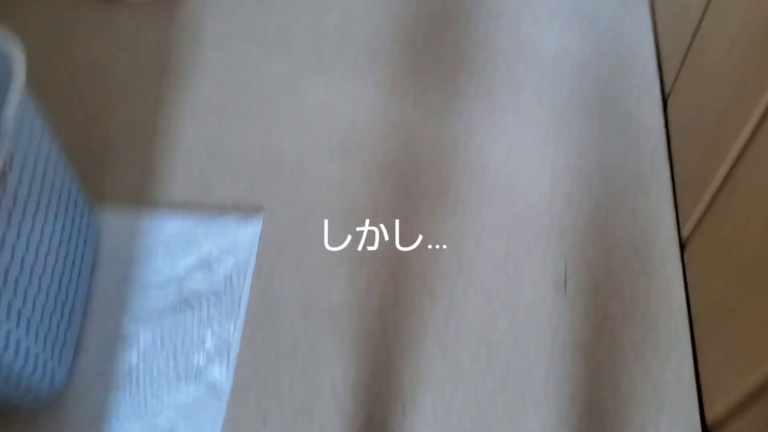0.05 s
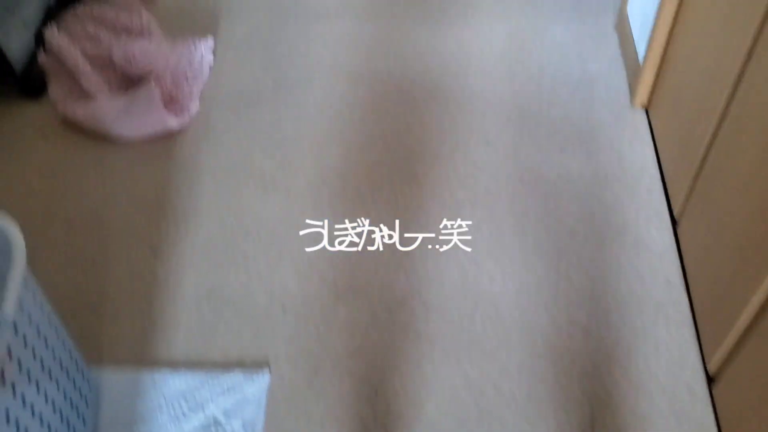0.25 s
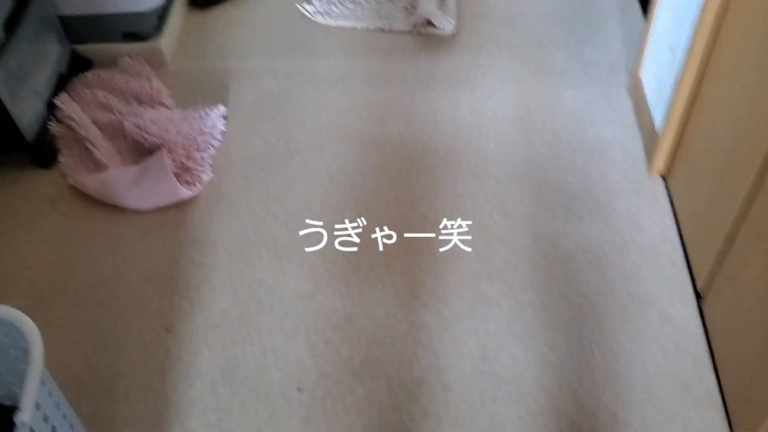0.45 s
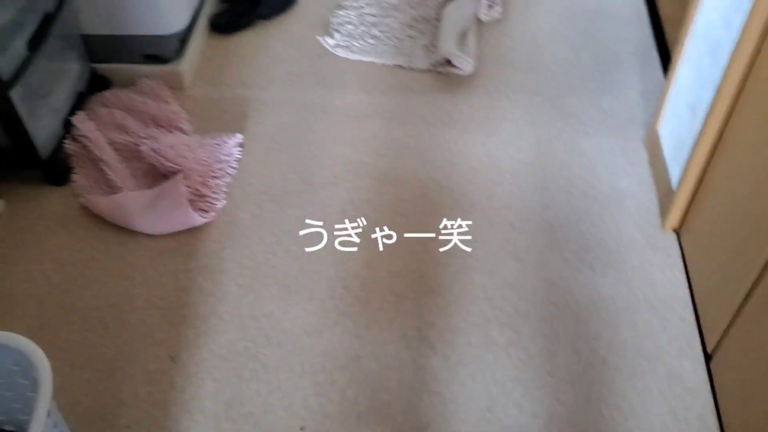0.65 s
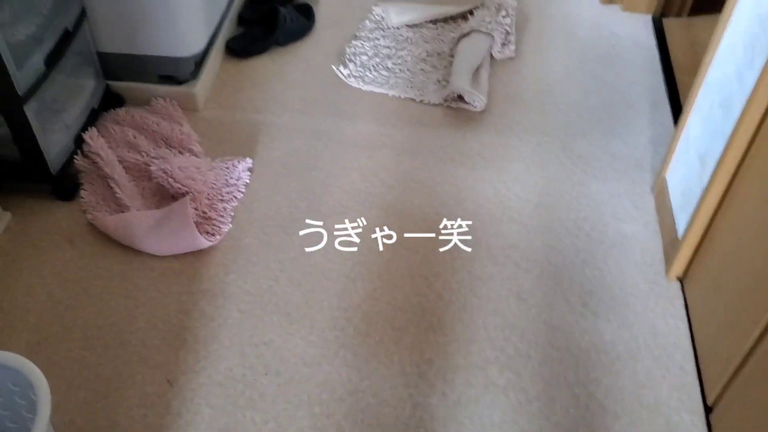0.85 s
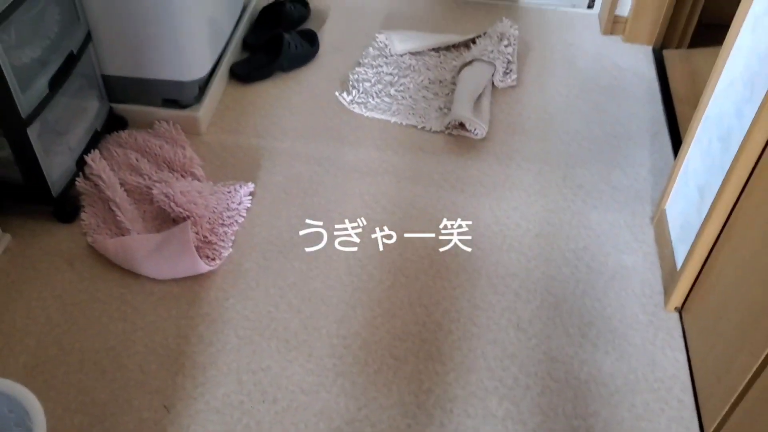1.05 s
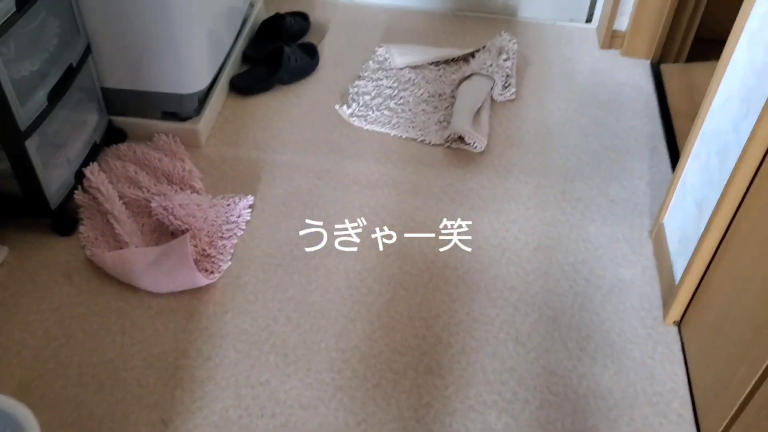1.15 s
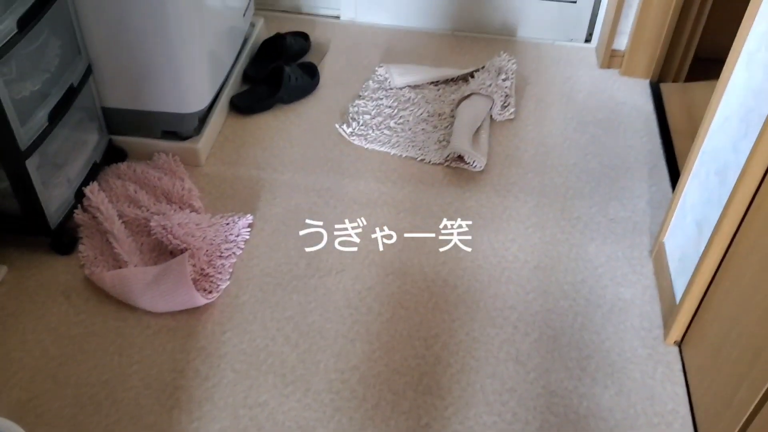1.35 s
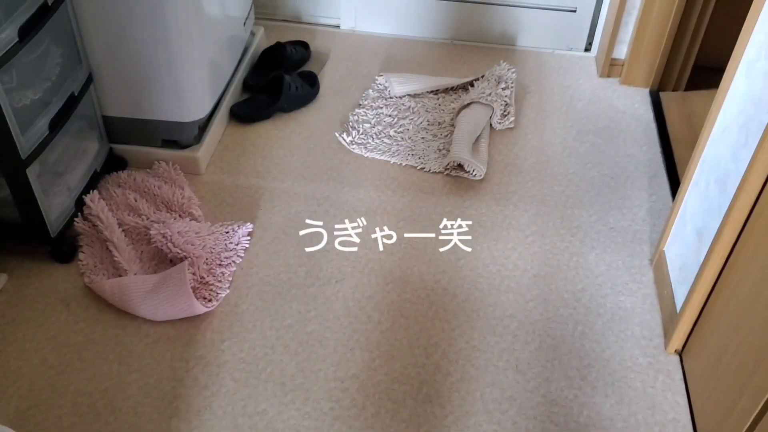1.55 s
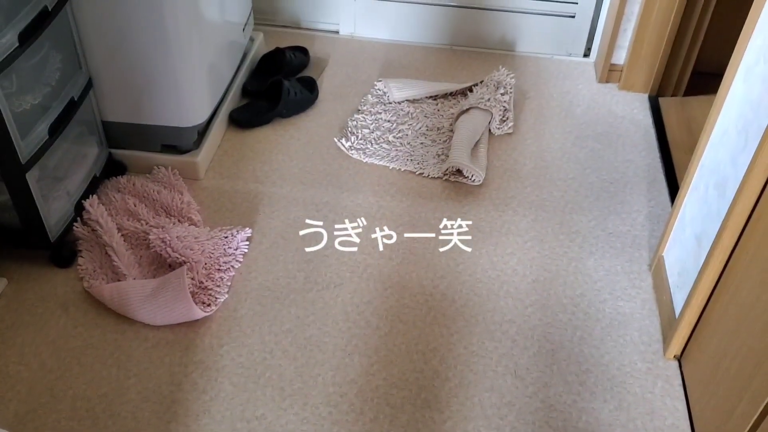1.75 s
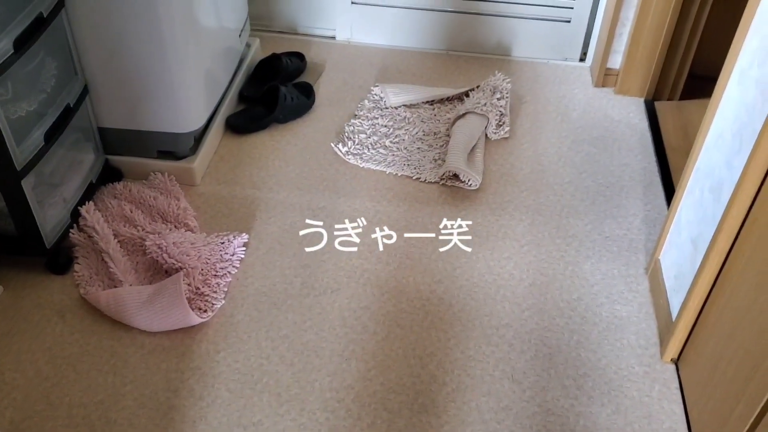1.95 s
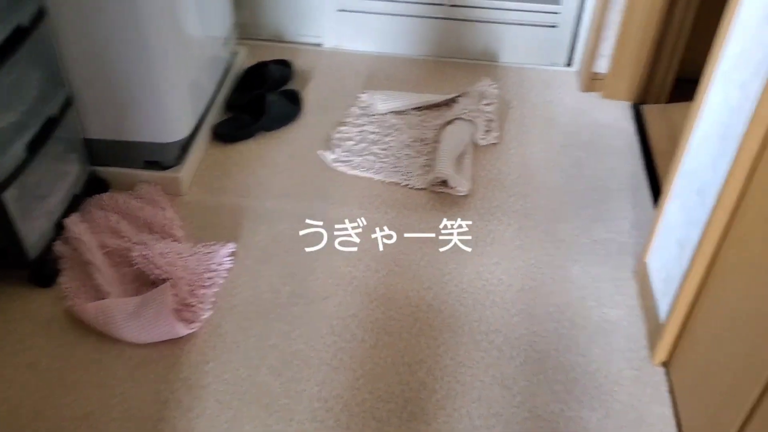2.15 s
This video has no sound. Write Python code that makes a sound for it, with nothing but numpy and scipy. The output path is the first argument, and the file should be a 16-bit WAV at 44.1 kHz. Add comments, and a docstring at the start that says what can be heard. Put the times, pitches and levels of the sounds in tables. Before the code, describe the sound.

A soft footstep thud, then a lighter one, in a quiet, faintly humming room.

```python
"""Two soft footsteps on a carpeted wooden floor in a quiet home.
A household appliance hums over faint room rumble, and cloth stirs. At 0.2 s the first foot thuds
into the boards: the sole taps, the wood knocks as the foot rolls, sole and cloth brush to rest.
A lighter step follows at 0.6 s. From 0.9 s the appliance's panels swell and sing along with its
motor, and that hum carries on over the rumble to the end."""
import sys
import numpy as np
from scipy import signal
from scipy.fft import rfft, irfft
from scipy.io import wavfile

SR = 44100
rng = np.random.default_rng(int(sys.argv[2]) if len(sys.argv) > 2 else 0)


def master_out(mix):
    """Clip the mix to full scale and print it as 16-bit PCM to the path in sys.argv[1]."""
    frames = np.transpose(np.atleast_2d(mix))
    ceiling = np.clip(frames, -1, 1)
    pcm = np.round(ceiling * 32767).astype(np.int16)
    wavfile.write(sys.argv[1], SR, pcm)


N = 97020
T = np.arange(N) / SR
HZ = np.fft.rfftfreq(N, 1 / SR)

# weight landing on the floor: t/s, level/dB, f/Hz that the blow excites most
THUDS = [(0.2082, -29, 237), (.2140, -18.5, 61), (0.2264, -21, 156), (0.2513, -22.5, 168.5),
         (0.2862, -31.5, 188), (0.3212, -33.5, 213), (0.5951, -35, 368), (0.6019, -31.5, 168),
         (0.6123, -44, 348), (.6350, -27, 137.6), (0.683, -47.5, 343)]
# floorboard modes: f/Hz, level/dB, t60/s
BOARD_MODES = [(111.7, 6.5, 0.12), (181.8, 8, 0.052), (207.7, -5.5, 0.178), (279.5, -0.5, 0.1),
               (363.6, -4, 0.13), (422, -2, 0.067), (530, -40, 0.11), (710, -13, 0.033)]
BLOW_DB_PER_OCT2, THUD_RISE_CYCLES, THUD_ROOM_DB, LOW_CUT_HZ = 26, 0.36, -20.5, 76.4
# woody knocks as the foot rolls and settles: t/s, level/dB, tilt/(dB per octave)
KNOCKS = [(.3086, -44, 1), (.3215, -42.5, -4), (.3275, -48, -4), (.6140, -50, -5)]
# the wood's ring under a knock: f/Hz, level/dB, t60/s
KNOCK_MODES = [(470, 0, .025), (740, 1, .018), (1040, -3, .018), (1416, -3, .018), (1764, -5, .022),
               (2330, -16, .02), (5800, -16, .006), (12400, -18, .006)]
KNOCK_TRIM_DB, KNOCK_ROOM_DB = -3.5, -8.5
# sole taps: t/s, level/dB, tilt/(dB per octave), low cut/Hz, t60/s
TAPS = [(0.2085, -61, -5, 2100, 0.17), (0.247, -60.5, 2.5, 2100, 0.061), (0.3095, -55, 3, 1200, 0.0093),
        (0.3426, -59, 3, 10500, 0.025), (0.434, -65.5, 5, 900, 0.05), (0.5946, -60.5, -1.5, 1900, 0.041),
        (0.612, -62, -7, 2100, 0.086), (0.731, -65.5, -6, 1500, .04)]
# EQ of a tap: f/Hz, level/dB
TAP_EQ = [(500, 3), (1200, -3.5), (1950, -4.5), (2300, 1), (2850, -1.5), (3500, -12), (7000, -15),
          (9000, -26), (11500, -12), (16000, -26)]
CONTACT_ATTACK_S, TAP_ROOM_DB = 0.00022, -7
# sole and cloth brushing: t/s, attack/s, level/dB, fade/(dB per s), tilt/(dB per octave), high cut/Hz
BRUSHES = [(-.05, 0.044, -71.5, 45.5, -1, 14100), (0.074, 0.0062, -77, 253, 5, 9600),
           (.165, 0.045, -75.5, 103, 8, 10200), (.218, 0.02, -62, 55, 2, 15000),
           (0.295, 0.019, -59.5, 91, -1, 19100), (.410, 0.027, -64.5, 93, -0.5, 15700),
           (.596, 0.019, -58.5, 110, 0, 13500), (.70, .045, -72.5, 172, -1, 14100)]
# EQ of a brush: f/Hz, level/dB
BRUSH_EQ = [(150, -0.5), (400, 1), (700, 6.5), (1300, -5), (2600, -9), (4400, -10), (6600, -15.5),
            (8600, -6.5), (11500, -10.5), (15500, -13)]
GRAINS_PER_S, GRAIN_SPREAD_DB, GRAIN_DB, FLUTTER_DB = 2300, 1.5, -4, 0.2
# envelope of the rustle that trails each step: t/s, level/dB
RUSTLE_FADER = [(.2, -100), (.21, -76), (.27, -74), (.32, -70), (.39, -73), (.5, -76), (.585, -85),
                (.6, -81), (.64, -72.5), (.70, -82), (.765, -77), (.79, -100)]
# EQ of the rustle: f/Hz, level/dB
RUSTLE_EQ = [(1200, -22), (2000, -1), (2300, -5), (2900, -5), (3500, -4), (6000, -18), (15000, -30)]
# pan of taps, brushes and rustle: f/Hz, left minus right/dB
FOOT_PAN = [(300, 2), (1300, -5.5), (2400, -1), (4400, -7), (7000, -5.5), (8300, 0), (11000, -7),
            (14000, 2)]
# peaks and dips on the way from foot to microphone: f/Hz, width/Hz, level/dB
PATH_RESONANCES = [(1133, 12, 6.5), (1405, 13, 9), (1726, 19, 5.5), (1735, 12, 11), (1887, 12, 1),
                   (2280, 190, 2.5), (2680, 200, 1.5), (4470, 80, -2), (7640, 490, -8.5)]

# tones of the appliance motor: f/Hz, level/dB
MOTOR_TONES = [(29.8, -66.5), (59.6, -54), (149, -71.5), (179, -72), (419, -83), (479, -80.5), (538, -84),
               (661, -83), (720, -89.5)]
# dips and lifts of the motor hum: t/s, level/dB
MOTOR_FADER = [(0, -3), (.26, -0.5), (.32, -9.5), (.5, -10), (.6, 3), (.79, -0.5), (.88, -5.5), (.96, 2),
               (1.33, 0), (2.2, 0.5)]
# ringing of the appliance panels: f/Hz, level/dB
PANEL_TONES = [(242, -72.5), (269.3, -66.5), (297, -73.5), (329.5, -69.5)]
# the panels' swell as it runs: t/s, level/dB
PANEL_FADER = [(0, -10.5), (.9, -11.5), (1.35, -1.5), (2.2, -1)]
HUM_WAVER_DB, MOTOR_DRIFT_RAD, PANEL_DRIFT_RAD = 1.92, 0.067, 1
# EQ of the room tone: f/Hz, level/dB
RUMBLE_EQ = [(20, -8), (32, 0), (45, -16), (65, 1.5), (90, 7), (120, -3), (165, -3), (220, -12.5),
             (330, -14), (450, -17), (680, -20.5), (1000, -27), (2000, -34.5), (4000, -40.5), (7500, -49),
             (9000, -45), (12000, -44), (15500, -44)]
# swell of its low end: t/s, level/dB
RUMBLE_FADER = [(0, -3), (.45, 1), (.8, 1.5), (2.2, 0)]
RUMBLE_DB, RUMBLE_WAVER_DB = -58, 1.44
# stereo image, narrow in the bass and wide on top: f/Hz, left-right correlation
CORRELATION = [(30, 0.91), (125, 0.92), (250, 0.4), (500, 0.31), (1000, 0.14), (3000, 0), (15000, 0.047)]
# reverb time of the room: f/Hz, t60/s
ROOM_T60 = [(100, 0.13), (500, 0.31), (3000, 0.25), (12000, 0.095)]
HIGH_CUT_HZ = 15720


def thuds():
    """Each blow presses the floor down and rings the modes near its pitch; low blows attack slower."""
    hz, db, t60 = np.transpose(BOARD_MODES)[:, :, None]
    t, out = np.arange(SR // 3) / SR, np.zeros(N)
    rings = np.sin(2 * np.pi * hz * t) * decay(t, t60)
    for start, level_db, centre_hz in THUDS:
        share = amp(db - BLOW_DB_PER_OCT2 * np.log2(hz / centre_hz) ** 2)
        body = (rings * share).sum(0) / share.sum()
        press = 1 - np.exp(-t * centre_hz / THUD_RISE_CYCLES)
        out[round(start * SR):][:len(t)] -= amp(level_db) * press * body
    out = irfft(rfft(out) * HZ ** 4 / (HZ ** 4 + LOW_CUT_HZ ** 4), N)
    return pan_right(out, 0.8) + amp(THUD_ROOM_DB) * room(out)


def knocks():
    """Hard little contacts ring short wooden modes, a touch to the right."""
    hz, db, t60 = np.transpose(KNOCK_MODES)[:, :, None]
    t, out = np.arange(SR // 10) / SR, np.zeros((2, N))
    for start, level_db, tilt_db in KNOCKS:
        phase = np.pi * rng.random((2, len(hz), 1))
        gains = amp(db + tilt_db * np.log2(hz / hz[0]))
        ring = (gains * np.sin(2 * np.pi * hz * t + phase) * decay(t, t60)).sum(1)
        ring *= np.minimum(t / CONTACT_ATTACK_S, 1)
        out[:, round(start * SR):][:, :len(t)] += amp(level_db + KNOCK_TRIM_DB) * ring / abs(ring).max()
    return pan_right(out + amp(KNOCK_ROOM_DB) * room(out), 1.5)


def taps():
    """Short, crisp slaps of the sole, thrown back by the room."""
    out = np.zeros((2, N))
    for start, level_db, tilt_db, low_hz, t60 in TAPS:
        t = np.maximum(T - start, 0)
        envelope = np.minimum(t / CONTACT_ATTACK_S, 1) * decay(t, t60)
        out += amp(level_db) * envelope * foot_eq(rng.standard_normal((2, N)), TAP_EQ, tilt_db, low_hz)
    return out + amp(TAP_ROOM_DB) * room(out)


def brushes():
    """Fibres catch and slip: a fine-grained hiss that swells and dies as the foot settles."""
    out = np.zeros((2, N))
    for start, attack, level_db, fade_db, tilt_db, top_hz in BRUSHES:
        sizes = amp(GRAIN_SPREAD_DB * np.minimum(rng.exponential(1, N), 5))
        catches = rng.random(N) < GRAINS_PER_S / SR
        hiss = rng.standard_normal((2, N))
        grains = amp(GRAIN_DB) * unit(sizes * catches * rng.standard_normal((2, N)))
        fade_in = np.clip((T - start) / attack, 0, 1)
        envelope = fade_in * amp(level_db - fade_db * np.maximum(T - start - attack, 0))
        out += envelope * foot_eq(hiss + grains, BRUSH_EQ, tilt_db, top_hz=top_hz)
    return out * amp(FLUTTER_DB * wander(rate_hz=51))


def rustle():
    """A papery mid-range rustle while the foot is moving."""
    return fader(RUSTLE_FADER) * foot_eq(rng.standard_normal((2, N)), RUSTLE_EQ, tilt_db=0, low_hz=900)


def appliance():
    """The motor hums, and the panels start to sing along."""
    motor = fader(MOTOR_FADER) * drone(MOTOR_TONES, MOTOR_DRIFT_RAD)
    panels = fader(PANEL_FADER) * drone(PANEL_TONES, PANEL_DRIFT_RAD)
    return motor + panels


def rumble():
    """Room tone: a gently heaving low end under a faint, steady hiss."""
    bed = amp(RUMBLE_DB) * stereo_eq(rng.standard_normal((2, N)), curve(RUMBLE_EQ, HZ))
    lows = irfft(rfft(bed) / (1 + (HZ / 700) ** 2), N)
    heave = fader(RUMBLE_FADER) * amp(RUMBLE_WAVER_DB * wander(rate_hz=8.9))
    return bed + lows * (heave - 1)


def room(x):
    """Small-room reverb, wet only: a diffuse tail that dies band by band."""
    hz, t, spectra = signal.stft(rng.standard_normal((2, SR // 2)), SR, nperseg=256)
    tail = signal.istft(spectra * decay(t, curve(ROOM_T60, hz)[:, None]), SR, nperseg=256)[1]
    tail *= np.minimum(np.arange(tail.shape[1]) / SR / 0.014, 1)  # builds up over 14 ms
    return signal.fftconvolve(np.atleast_2d(x), tail / np.linalg.norm(tail[0]), axes=1)[:, :N]


def drone(tones, drift_rad):
    """Held sines, each wavering a little in level and pitch."""
    out = np.zeros(N)
    for hz, db in tones:
        gain = np.sqrt(2) * amp(db + HUM_WAVER_DB * wander(rate_hz=7.4))
        out += gain * np.sin(2 * np.pi * (hz * T + rng.random()) + drift_rad * wander(rate_hz=1.4))
    return out


def foot_eq(pair, eq, tilt_db, low_hz=50, top_hz=20000):
    """Voices foot noise with EQ, path resonances, low and high cuts, tilt and a band-by-band pan."""
    peaks = sum(db * np.exp(-((HZ - hz) / width) ** 2) for hz, width, db in PATH_RESONANCES)
    cuts = -10 * np.log10((1 + (low_hz / (HZ + 1)) ** 4) * (1 + (HZ / top_hz) ** 10))
    tilt = tilt_db * np.log2(np.maximum(HZ, 300) / 3000)
    pan = np.outer([.5, -.5], curve(FOOT_PAN, HZ))
    return stereo_eq(pair, curve(eq, HZ) + peaks + cuts + tilt + pan)


def stereo_eq(pair, db):
    """Blends two noises as mid and side, then applies an EQ; comes out at rms 1."""
    mid, side = rfft(pair)
    width = np.arccos(curve(CORRELATION, HZ)) / 2
    mid, side = mid * np.cos(width), side * np.sin(width)
    return unit(irfft(np.array([mid + side, mid - side]) * amp(db), N))


def pan_right(x, db):
    """Turns the left channel down and the right up, by db each."""
    return x * amp([[-db], [db]])


def wander(rate_hz):
    """Smooth random modulation at rms 1, rolled off above rate_hz."""
    return unit(irfft(rfft(rng.standard_normal(N)) / (1 + (HZ / rate_hz) ** 4) * (HZ > 0), N))


def fader(points):
    """Gain over time from a level curve."""
    return amp(np.interp(T, *np.transpose(points)))


def curve(points, hz):
    """Reads a table on a log-frequency axis."""
    f, value = np.transpose(points)
    return np.interp(np.log(hz + 1), np.log(f + 1), value)


def decay(t, t60):
    """Ring-out that falls 60 dB in t60 seconds."""
    return amp(-60 * t / t60)


def amp(db):
    """Decibels to gain."""
    return 10 ** (np.asarray(db) / 20)


def unit(x):
    """Scales to rms 1."""
    return x / np.sqrt(np.mean(x ** 2) + 1e-20)


def scene():
    """Footsteps up front, the house as a bed behind them."""
    footsteps = thuds() + knocks() + taps() + brushes() + rustle()
    return footsteps + pan_right(appliance() + rumble(), 0.3)


def record(dry):
    """A steep high cut on the whole mix."""
    lowpass = signal.firwin(1023, HIGH_CUT_HZ, window=("kaiser", 9), fs=SR)
    return signal.oaconvolve(dry, lowpass[None], "same")


dry = scene()
out = record(dry)
master_out(out)
```